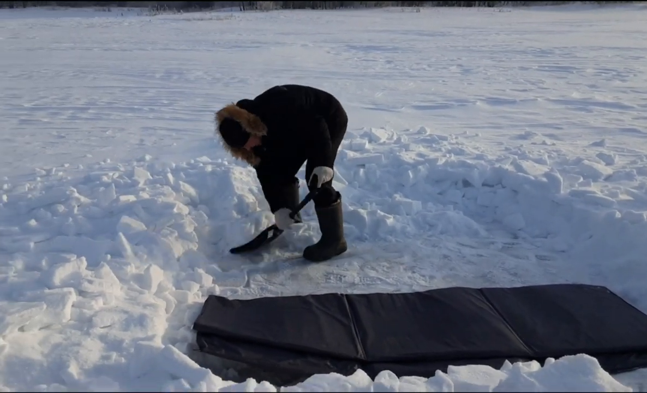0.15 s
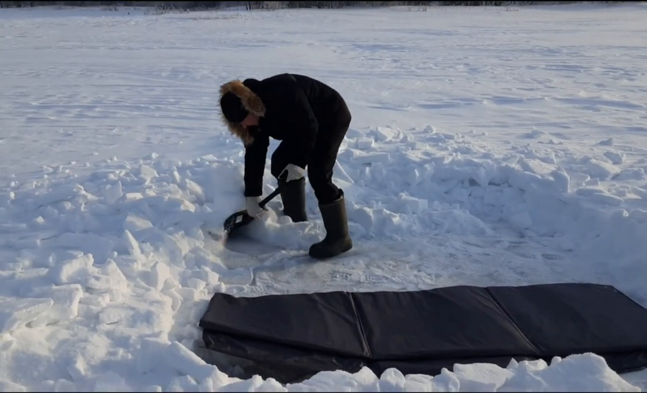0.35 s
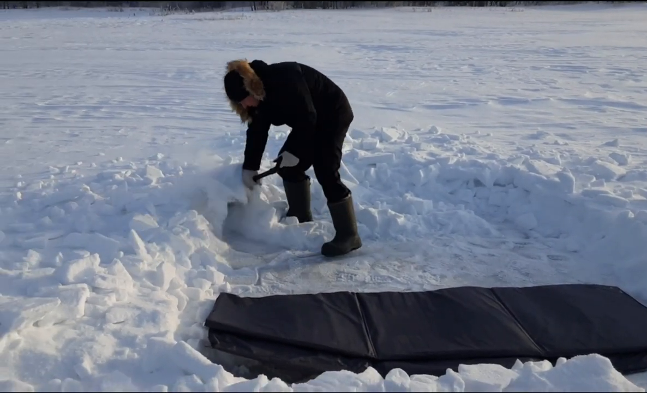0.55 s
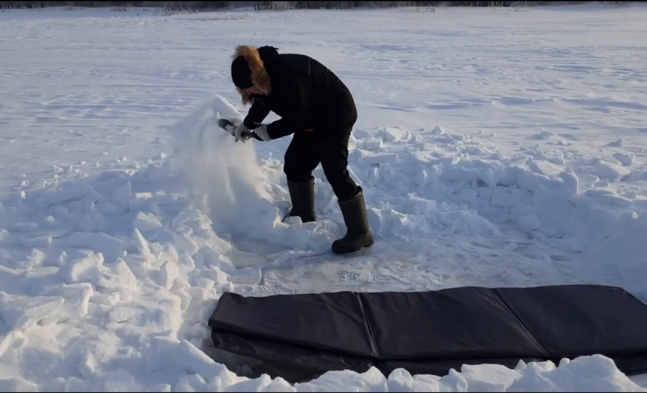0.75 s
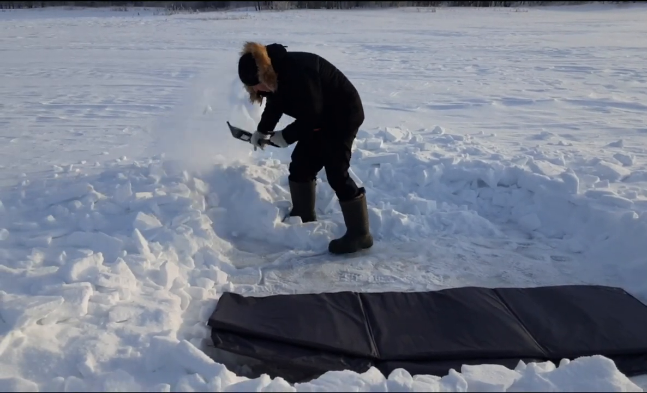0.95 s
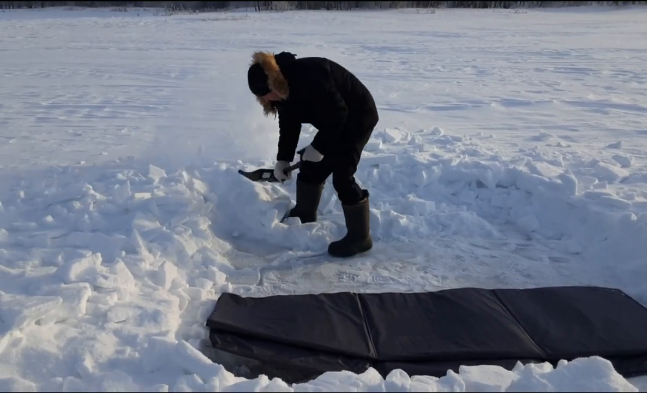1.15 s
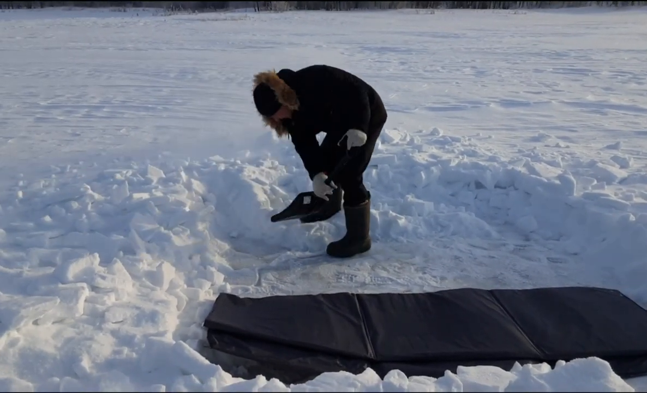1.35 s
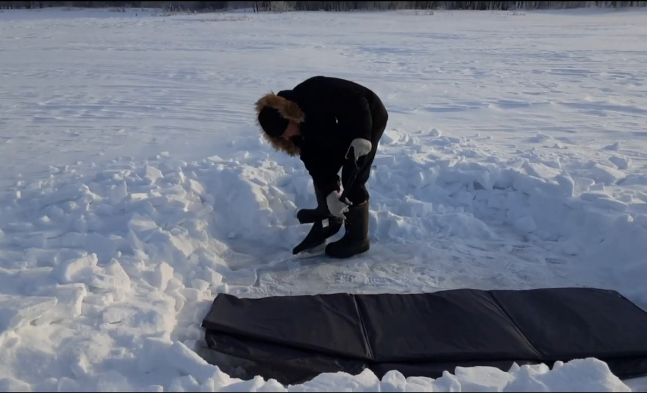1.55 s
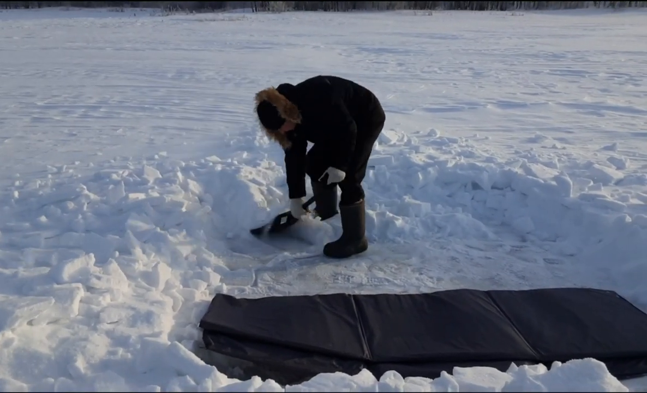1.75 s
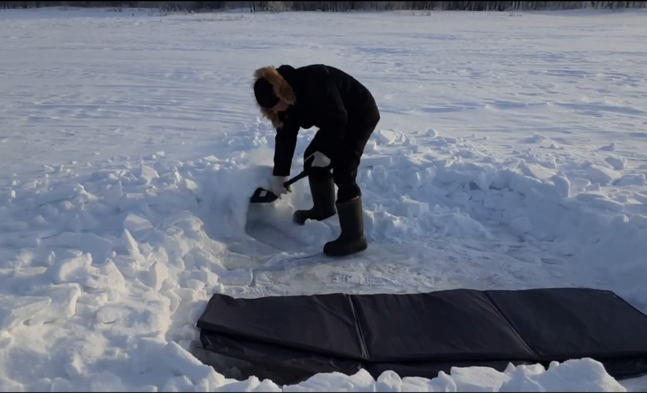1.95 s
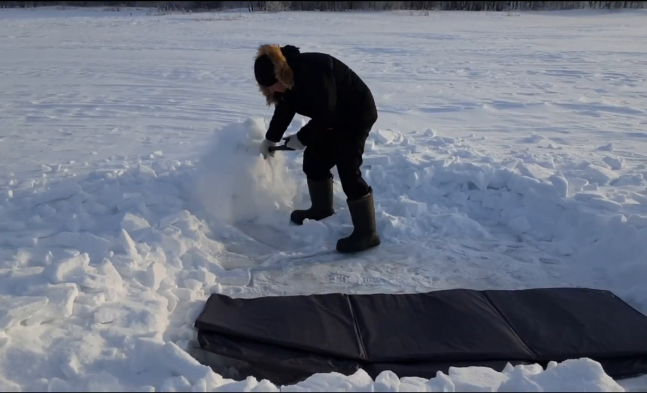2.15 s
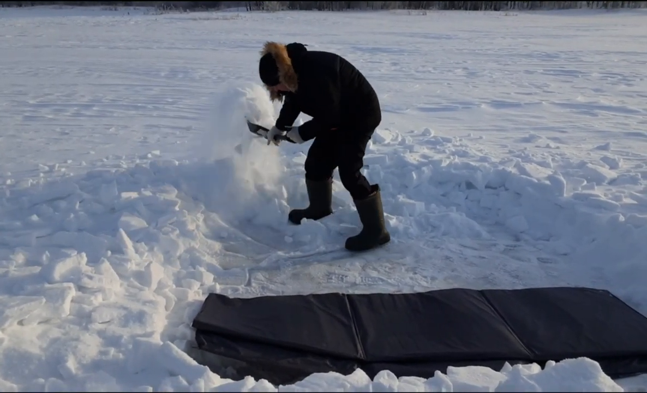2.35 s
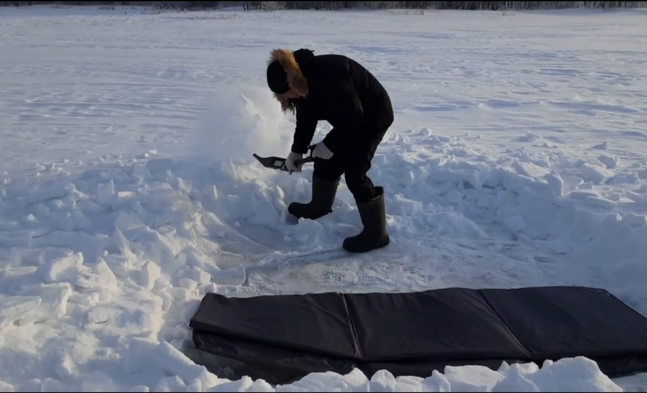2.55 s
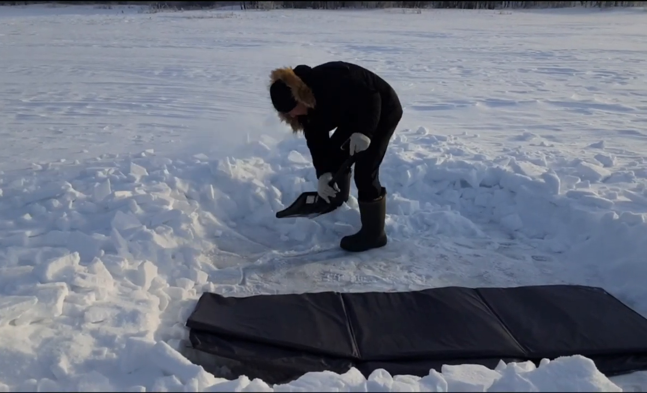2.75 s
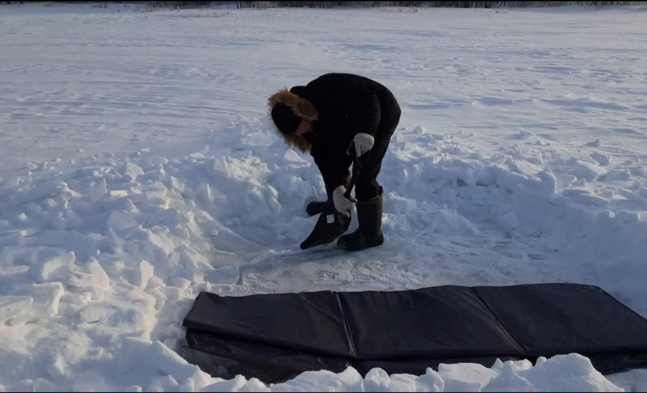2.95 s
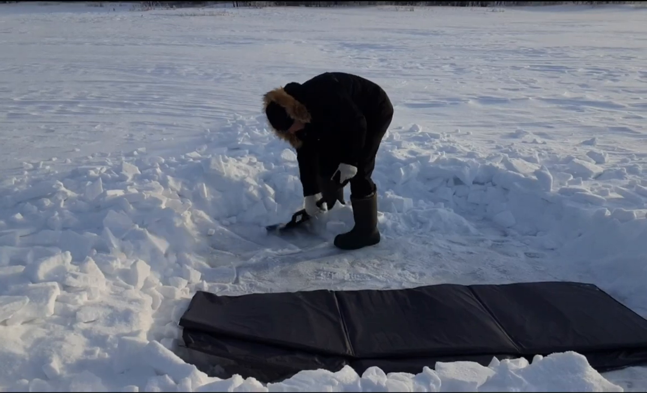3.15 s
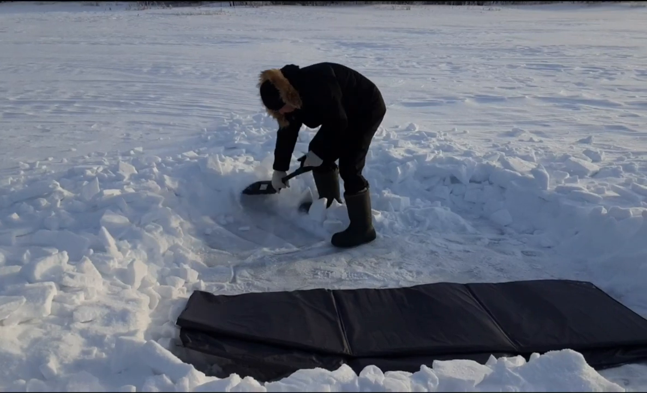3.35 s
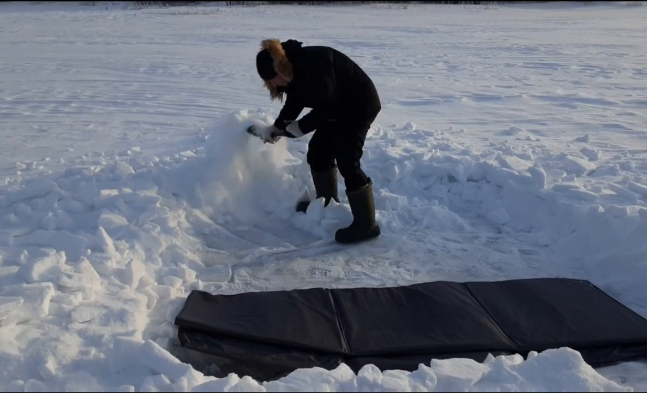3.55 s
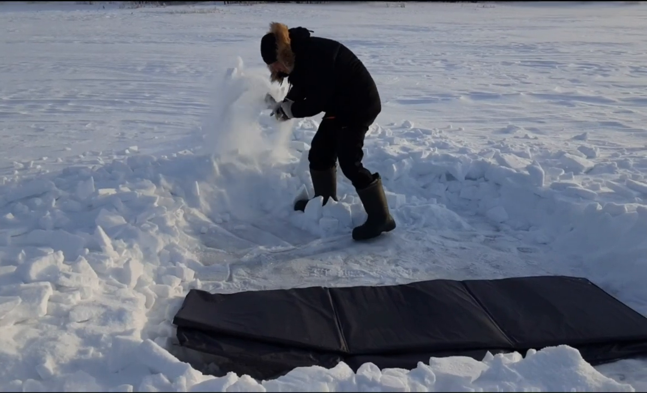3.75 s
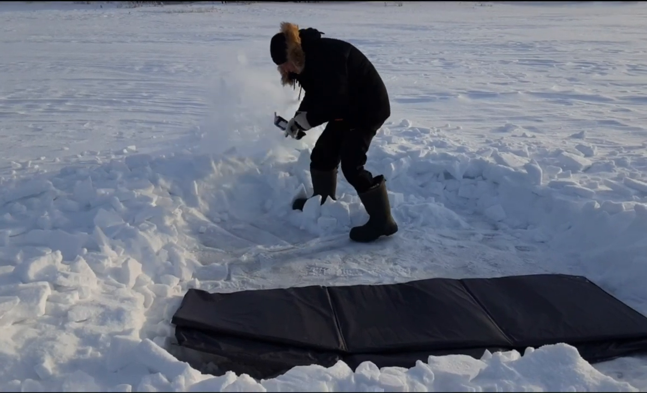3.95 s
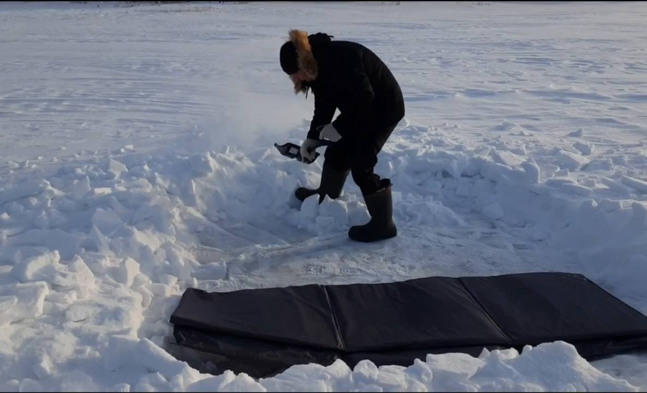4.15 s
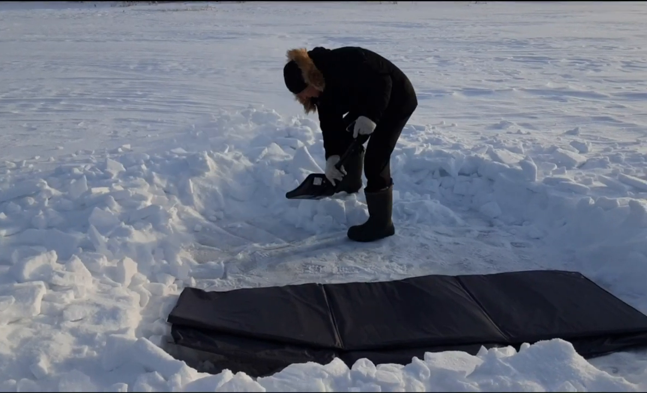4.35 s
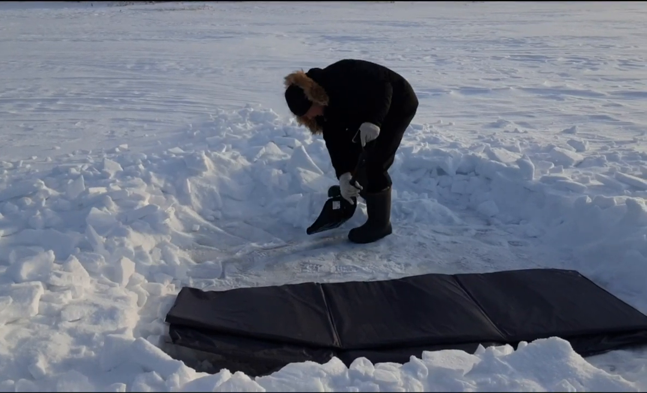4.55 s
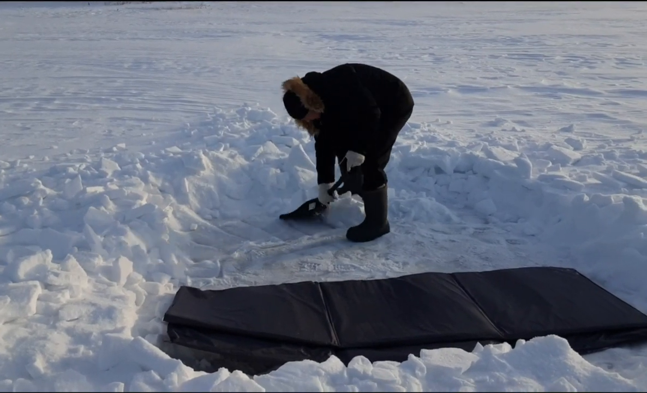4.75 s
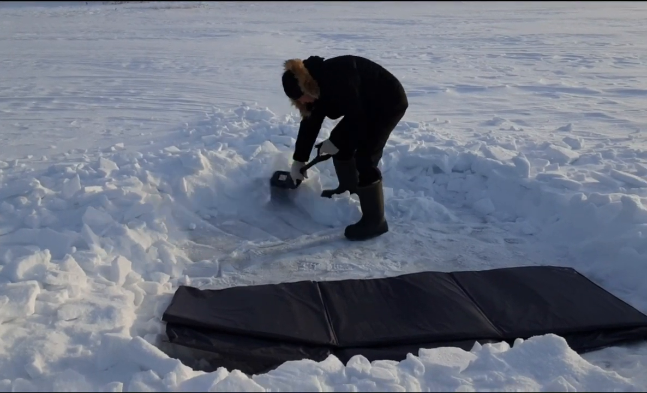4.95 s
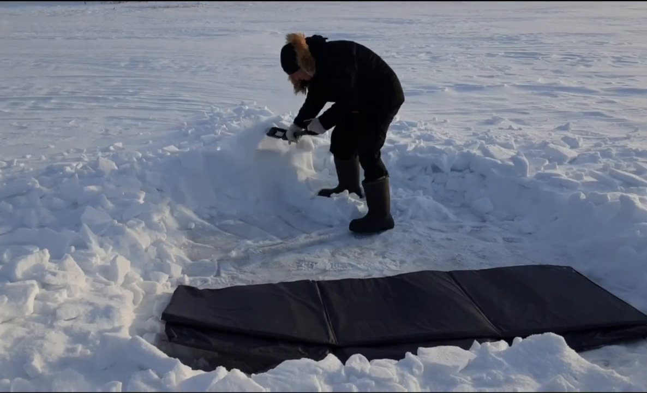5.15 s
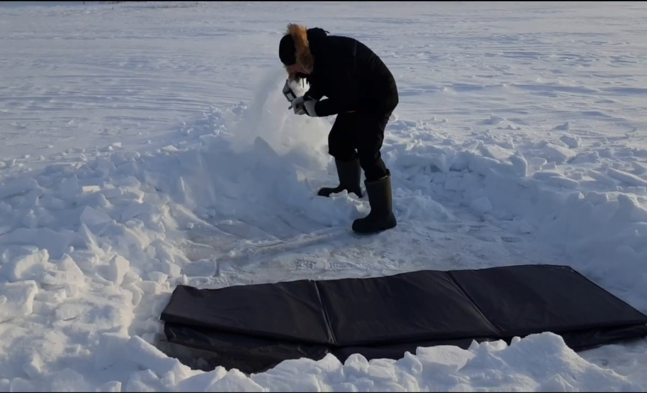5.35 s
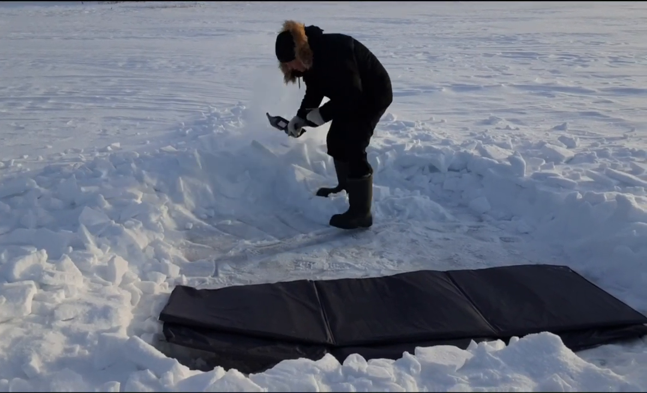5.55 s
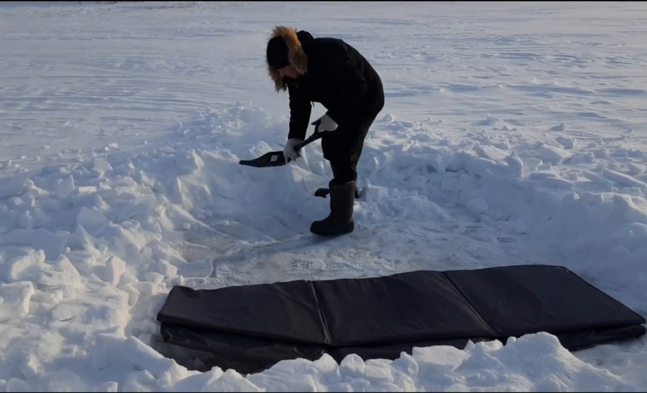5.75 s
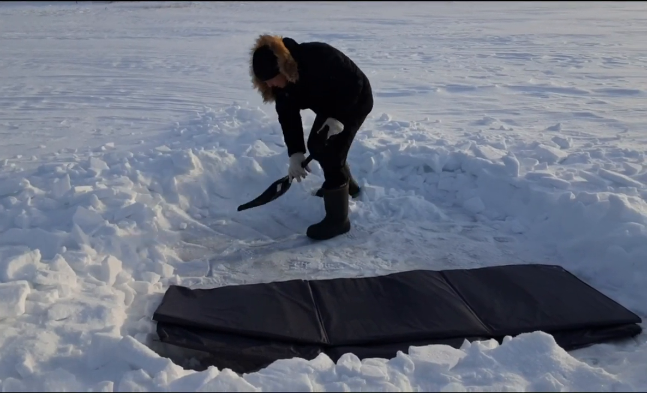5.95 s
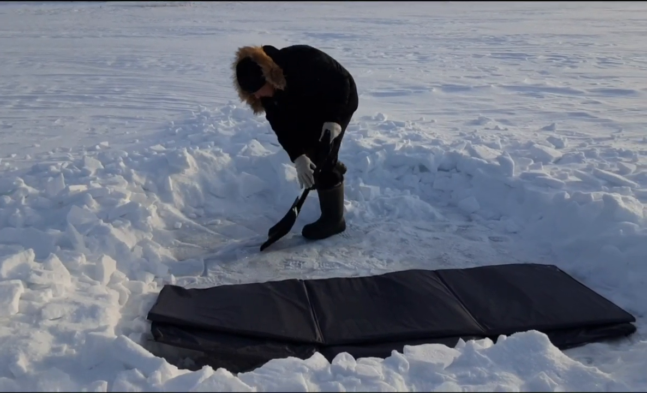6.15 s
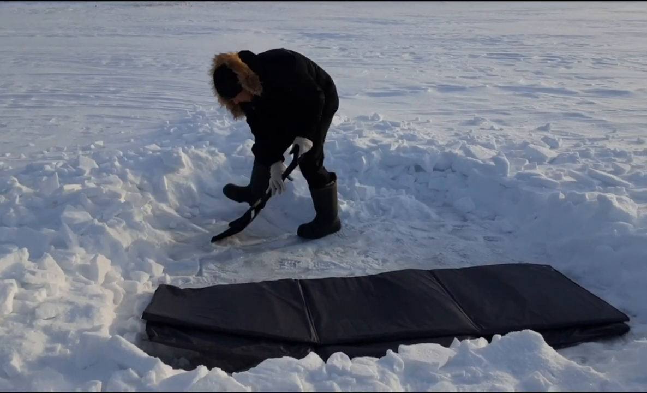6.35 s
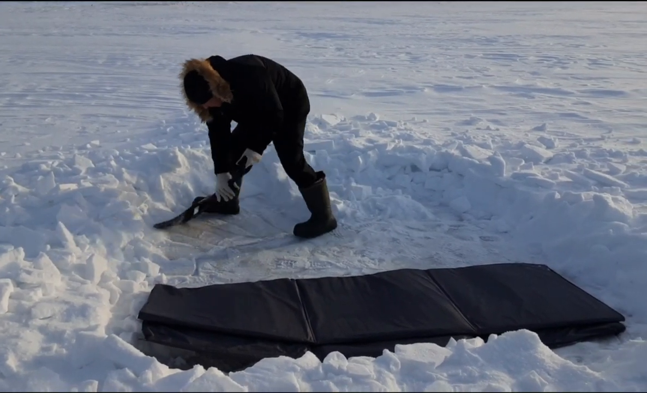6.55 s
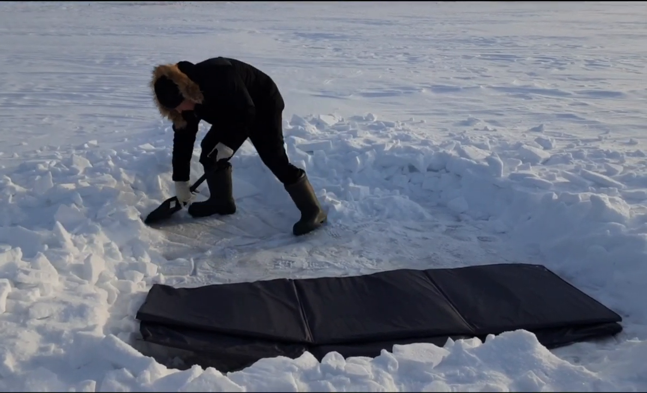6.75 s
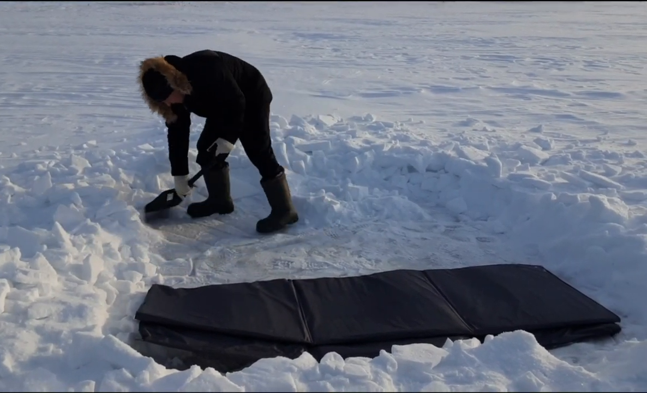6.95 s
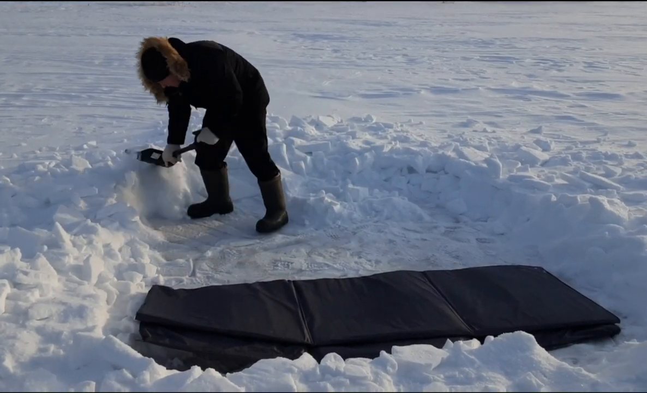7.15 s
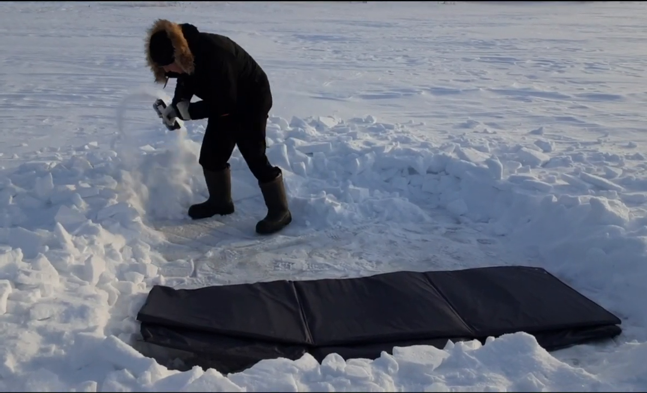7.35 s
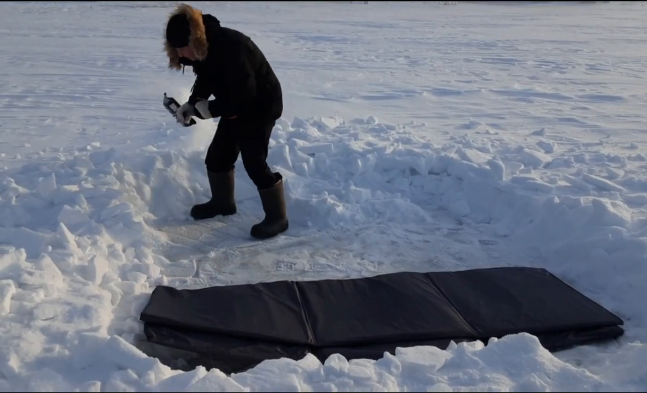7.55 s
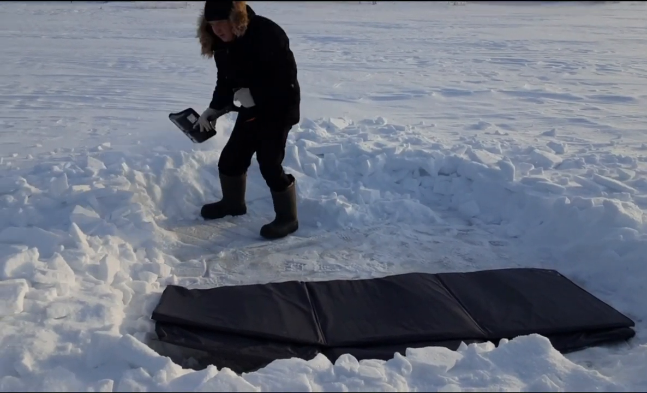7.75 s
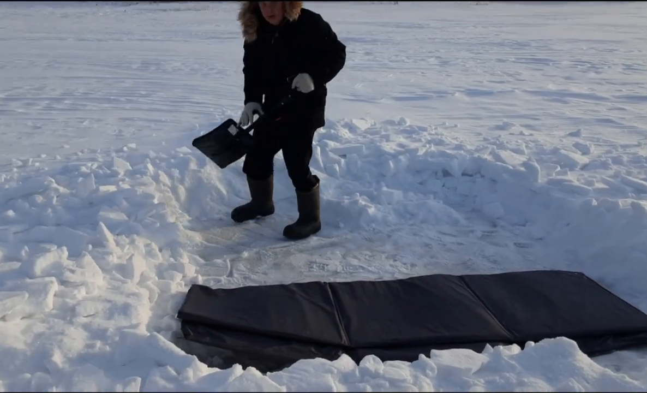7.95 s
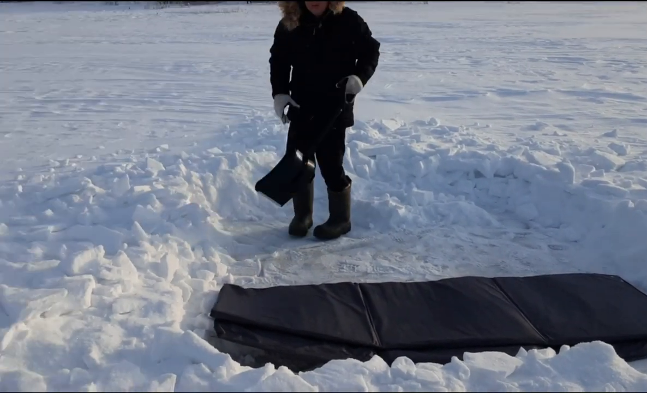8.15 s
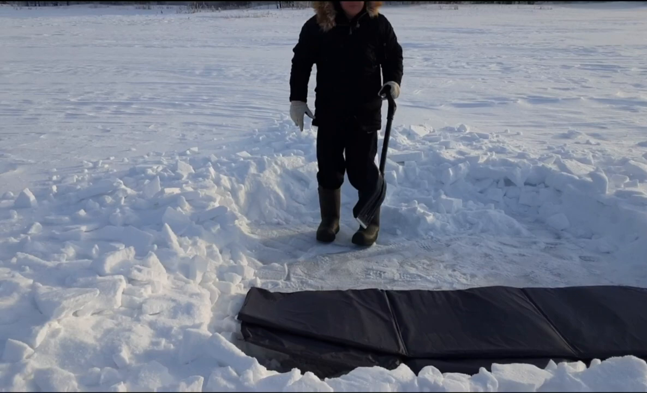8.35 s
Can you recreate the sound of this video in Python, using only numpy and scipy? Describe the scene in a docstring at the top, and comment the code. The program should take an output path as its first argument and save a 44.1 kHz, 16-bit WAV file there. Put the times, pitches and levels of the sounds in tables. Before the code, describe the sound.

A short shovel crunches into packed snow on lake ice in five strokes, with powder hissing, lumps ticking and thudding, and brief squeaks near the end.

```python
"""Shovelling snow on lake ice

A short shovel is pushed into packed snow, lifted and emptied, five strokes, in the open.
Random breaking grains excite the blade, the scoop's hollow and filtered snow; powder is hissing grains.
Thrown lumps thud as damped low tones and tick as short noise bursts, boots and sliding snow crunch,
the edge squeaks as a gliding tone, and a far motor hums over a low outdoor rumble."""
import sys
import numpy as np
from scipy import signal
from scipy.fft import rfft, irfft
from scipy.io import wavfile

SR = 44100
rng = np.random.default_rng(int(sys.argv[2]) if len(sys.argv) > 2 else 0)


def transcribe(signal):
    """Save signal, clipped to [-1, 1], as a 16-bit WAV file at the path in sys.argv[1]."""
    frames = np.atleast_2d(signal).T
    limited = np.clip(frames, -1, 1)
    pcm = np.round(limited * 32767).astype(np.int16)
    wavfile.write(sys.argv[1], SR, pcm)


def ratio_of_db(decibels):
    """Turn decibels (scalar or array-like) into linear amplitude factors; 0 dB maps to 1."""
    return 10 ** (np.asarray(decibels, float) / 20)


N = 374409

# pushes of the blade, one list each: (time [s], crunch [dB], powder hiss [dB])
STROKES = [
    [(0, -28, -32.5), (.084, -22.5, -30), (.17, -31, -38), (.267, -33, -38.5), (.369, -46, -49),
     (.401, -43, -45.5), (.515, -57.5, -59.5), (.6, -64, -72)],
    [(1.4, -59, -62), (1.435, -55, -46), (1.441, -38.5, -40), (1.469, -31.5, -33), (1.521, -24.5, -32.5),
     (1.636, -31, -36), (1.746, -31, -39), (1.798, -40, -41.5), (1.852, -45, -51), (1.9, -70, -67)],
    [(2.858, -55, -60), (2.863, -32, -36), (2.931, -27.5, -33.5), (2.989, -25.5, -34), (3.083, -30.5, -39),
     (3.111, -29, -37.5), (3.195, -37, -37.5), (3.243, -44, -48), (3.3, -70, -70)],
    [(4.46, -74, -73), (4.466, -50, -39), (4.476, -29.5, -43), (4.486, -24, -24), (4.514, -34.5, -35),
     (4.568, -23, -32.5), (4.62, -23, -34.5), (4.635, -31, -38), (4.677, -30.5, -37), (4.817, -43.5, -45),
     (4.99, -49.5, -50), (5.14, -62, -66)],
    [(6.028, -77, -62), (6.034, -29, -50), (6.044, -22, -42.5), (6.052, -33, -56), (6.078, -37, -49),
     (6.156, -27, -42.5), (6.206, -36, -48), (6.24, -26, -42), (6.389, -27.5, -40.5), (6.499, -30, -34.5),
     (6.587, -29.5, -39), (6.643, -35, -45), (6.733, -38, -45.5), (6.773, -47, -49), (6.85, -68, -65)],
]
# loose snow slides off the scoop, lands, or gives under a boot: (peak time [s],
# swell by 10 dB [s], fade by 10 dB [s], crunch [dB], powder hiss [dB])
SLIDES = [(.61, .07, 0.2, -51, -50), (.75, 0.06, .022, -51, -46.5), (.99, .055, .075, -37, -54),
          (1.145, .07, .04, -50, -44), (1.245, .07, .015, -51, -48), (1.341, 0.17, 0.14, -53.5, -55.5),
          (1.95, .17, .085, -44, -52), (2.09, .04, 0.07, -45.5, -50), (2.26, 0.34, .09, -59, -53),
          (2.34, .045, .08, -41, -54), (2.435, .08, .022, -39, -45), (2.55, .07, .13, -47, -43),
          (2.7, .01, 0, -39, -46), (3.268, .02, .05, -41.5, -39), (3.325, .04, .022, -45, -44),
          (3.39, 0.06, .06, -43.5, -47.5), (3.58, 0.2, 0.12, -48, -48), (3.652, .02, .02, -48, -48),
          (3.89, .15, .07, -41, -57), (3.925, .025, .17, -50.5, -45.5), (4.212, .012, .1, -47, -48),
          (4.31, .06, .06, -46, -44.5), (4.366, .04, .022, -46, -50), (4.857, 0.01, .04, -38.5, -39),
          (4.93, .045, 0.04, -39, -38.5), (5.055, 0.04, .06, -41, -46), (5.125, .04, .012, -46, -58),
          (5.275, .14, .06, -52, -49), (5.55, .055, 0.17, -41, -52), (5.7, 0.09, 0.09, -40.5, -56),
          (5.8, 0.14, .12, -55, -55), (6.83, .06, .05, -41, -44), (6.868, .01, .03, -38, -44),
          (6.922, 0.0251, .02, -32, -44), (6.96, 0.12, 0.02, -46, -44), (7.029, 0, .02, -33, -38),
          (7.08, 0.15, 0.08, -47.5, -50.5), (7.234, 0.13, 0.06, -48.5, -51), (7.385, .05, .045, -42.5, -49),
          (7.46, .06, 0.09, -50, -55), (7.59, .1, 0.12, -52, -54), (8.028, 0, 0.06, -44, -52),
          (8.135, .015, .07, -46.5, -53), (8.25, 0, 0.4, -54.5, -62)]
SLIDE_ROUNDNESS = 1.47   # 1 pointed, 2 bell-shaped
# snow trickling between the slides: (time [s], crunch [dB], powder hiss [dB])
TRICKLE = [(0, -60, -60), (.55, -58, -58), (.85, -66, -67), (1.2, -60, -57), (1.28, -65, -62),
           (1.4, -65, -68), (2.2, -62, -60), (2.83, -57, -56.5), (3.2, -62, -60), (3.7, -58, -56),
           (4.1, -64, -57), (4.2, -68, -61), (4.44, -72, -72), (5.2, -61, -57), (5.42, -72, -62),
           (5.85, -64, -60), (6.0, -72, -65), (7.2, -60, -61), (7.7, -64, -63), (7.82, -74, -68),
           (8.01, -82, -77), (8.1, -62, -68), (8.49, -62, -63)]
# what the edge meets: (time [s], ringing share of crunch power [0-1], powder fineness before band weights [dB])
EDGE_CONTACT = [(0, 0.25, -0.5), (1.4, 0.34, 2), (2.4, 0.07, 1.5), (2.8, 0.64, -4.5), (3.6, 0.13, 3),
                (4.4, 0.43, -1), (5.2, 0.46, 2.5), (5.95, 0, -4.5), (6.05, 0.83, -7), (6.3, 0.87, 8),
                (6.6, 0.58, 3.5), (7.0, 0.33, 7.5), (7.3, 0.65, 1.5), (8.49, 0, -0.5)]
# scoop fills and empties: (time [s], hollow pitch [Hz], loaded-snow thrum re crunch, at -38 dB crunch [dB])
SCOOP = [(0, 1400, -9.5), (.4, 1850, -11.5), (.78, 1200, -18), (1.0, 1350, -11), (1.5, 1380, -8),
         (1.75, 1250, -7.5), (1.95, 1550, -22), (2.4, 1350, -8.5), (2.6, 1600, -11), (2.9, 1450, -6),
         (3.19, 1130, -7.5), (3.26, 2100, -17), (3.36, 1450, -10), (3.92, 1350, -15), (4.4, 1400, -8.5),
         (4.5, 1620, -1.5), (4.7, 1350, -4.5), (4.93, 1750, -2.5), (5.13, 1300, 0), (5.17, 1400, -16),
         (5.55, 1650, -24), (5.7, 1350, -10.5), (6.0, 1450, -7), (6.04, 1070, -7.5), (6.13, 1500, -12.5),
         (6.23, 1150, -14), (6.5, 1350, -8.5), (6.86, 1100, -12.5), (6.93, 1680, -16), (7.03, 1330, -19),
         (7.4, 1550, -11.5), (8.0, 1600, -15), (8.49, 1150, -5)]
THRUM_LAG = 0.29   # dB of thrum lost per dB of crunch
# low push through the pack, as at a crunch of -40 dB: (time [s], level [dB])
PUSH = [(0, -48), (.3, -41), (.6, -51), (.85, -47), (1.2, -47), (1.33, -38), (1.39, -48), (1.6, -42),
        (1.95, -52), (2.4, -50), (2.56, -40), (2.9, -46), (3.2, -42), (3.85, -52), (3.96, -42), (4.25, -50),
        (4.6, -42), (5.06, -40), (5.3, -47), (5.62, -43), (6.0, -44), (6.15, -41), (6.55, -41), (6.85, -50),
        (7.4, -47), (7.7, -47), (8.49, -50)]
PUSH_FOLLOWS, PUSH_LUMPY_DB = 0.55, 2.0   # share of the crunch's swing; unevenness
# blade and scoop modes: (frequency [Hz], width per filter pass [Hz], relative level [dB])
BLADE_MODES = [(980, 253, 2.5), (1510, 260, -4.5), (1793, 200, 0), (2393, 335, 1), (2970, 160, -3),
               (3240, 710, -9.5)]
# edge modes: (frequency [Hz], width per filter pass [Hz], relative level [dB])
RIM_MODES = [(4400, 950, -2), (5850, 1260, 0), (6920, 740, 0.5), (7700, 400, -29)]
# spectrum of bare breaking snow: (frequency [Hz], relative density [dB per Hz])
CRUNCH_SPECTRUM = [(410, -34.5), (700, -13), (1420, -8), (2070, -15), (2490, -13), (4040, -26.5),
                   (4500, -20.5), (5850, -36), (9900, -120)]
# spectrum of powder hiss: (frequency [Hz], relative density [dB per Hz])
POWDER_SPECTRUM = [(1880, -15.5), (3200, -4.5), (3930, -4.5), (4450, -6.5), (5030, -5), (9660, 4),
                   (11000, -11), (15500, -11), (16200, -36), (16500, -41)]
# spectrum of the groaning pack: (frequency [Hz], relative density [dB per Hz])
PACK_SPECTRUM = [(18, -59), (30, -35), (65, -7.5), (109, -4.5), (199, 1), (351, -9), (399, -19.5),
                 (480, -17), (620, -37), (1060, -120)]
# spectrum of the loaded snow's dull thrum: (frequency [Hz], relative density [dB per Hz])
THRUM_SPECTRUM = [(200, -33.5), (340, -5.5), (497, 3.5), (719, -5), (800, -3), (1040, -20), (1760, -120)]
# thrown lumps of snow ticking, levels before the mix: (time [s], peak [dB], pitch [Hz], bright crack [dB])
TICKS = [(.808, -35, 600, -45.5), (.831, -32.5, 615, -61), (.885, -42, 616, -59), (.907, -40, 1240, -59),
         (1.069, -30, 1060, -50), (1.083, -27, 1240, -53), (1.128, -19, 1240, -49),
         (1.149, -27.5, 2580, -35), (1.847, -27, 1010, -52), (2.095, -31.5, 646, -52),
         (2.412, -23, 1430, -47), (2.588, -30.5, 2490, -43), (2.692, -33, 1220, -33),
         (2.87, -15, 1080, -23), (3.257, -22, 2380, -39), (3.518, -33, 1360, -51), (3.611, -29, 1890, -36),
         (3.914, -29, 1030, -30), (3.956, -23, 1280, -51), (3.989, -23, 1240, -45), (4.204, -32, 1300, -52),
         (4.464, -40, 1460, -32), (4.476, -20, 1780, -19), (4.621, -7.5, 1720, -42), (5.441, -36, 590, -59),
         (5.459, -35, 590, -63), (5.484, -36, 600, -45), (5.509, -26.5, 700, -49),
         (5.547, -18.5, 1510, -57), (5.702, -23, 1230, -43), (5.754, -23.5, 1400, -43),
         (5.778, -31, 1610, -44), (5.819, -26, 1420, -40), (6.032, -19, 990, -45),
         (6.042, -29, 1100, -31.5), (6.11, -26, 2310, -33), (6.249, -14.5, 1070, -44),
         (6.299, -10.5, 956, -40), (6.562, -16, 1120, -31), (6.583, -11, 1160, -37),
         (7.024, -33, 1060, -26), (7.034, -35, 1290, -29), (7.161, -32, 2500, -38), (7.178, -34, 910, -59),
         (7.333, -36, 1190, -55), (7.682, -35, 1770, -42), (7.787, -50, 1500, -48), (7.877, -43, 1100, -42),
         (7.948, -50, 778, -52), (8.024, -30, 2190, -36), (8.092, -35, 1210, -45), (8.134, -38, 1470, -51),
         (8.211, -30.5, 1250, -45), (8.396, -35, 980, -43)]
TICK_T60_S = 0.023
# further ticks at random times; peak over the crunch, before the mix
RANDOM_TICKS, TICK_OVER_DB, TICK_SPREAD_DB = 120, 6.0, 4.0
# lumps landing and the blade striking the ice: (envelope peak time [s], envelope peak [dB], pitch [Hz])
THUDS = [(0.295, -33, 186), (.981, -39.5, 217), (1.028, -40, 155), (1.126, -29, 160), (1.294, -30.5, 184),
         (1.316, -24.5, 266), (1.513, -26.5, 243), (2.546, -26.5, 213), (2.592, -25.5, 204),
         (2.636, -28, 198), (2.871, -21, 167), (3.019, -23, 195), (3.392, -31, 175), (3.517, -36, 229),
         (4.495, -21.5, 186), (4.602, -16.5, 215), (4.626, -17.5, 209), (4.837, -29.5, 163),
         (4.866, -32, 182), (4.938, -26, 163), (5.038, -31, 211), (5.613, -23, 94.5), (5.707, -28, 81),
         (5.759, -33, 248), (5.796, -33, 192), (6.046, -18, 187), (6.297, -23.5, 222), (6.397, -23, 188),
         (7.025, -32.5, 169), (8.033, -38.5, 101)]
THUD_T60_S = 0.04
# edge squeaking on the ice, one list each: (time [s], pitch [Hz], mean level [dB])
SQUEAKS = [
    [(6.628, 1120, -55), (6.636, 1190, -32), (6.655, 1310, -33), (6.678, 1360, -36), (6.705, 1270, -37),
     (6.73, 1150, -50)],
    [(6.854, 800, -55), (6.859, 850, -36), (6.875, 1020, -42), (6.905, 1200, -44), (6.93, 1400, -52)],
]
# spectrum of outdoor air: (frequency [Hz], relative density [dB per Hz])
AIR_SPECTRUM = [(18, -75), (30, 5.5), (153, 8), (1190, -25), (1720, -19), (2750, -19), (3580, -48),
                (5900, -35), (9460, -28.5), (16000, -20)]
AIR_DB = -56
HUM_HZ, HUM_DB = 312, -65   # far motor, mean values


def rms_one(x):
    """Scale to unit rms."""
    return x / np.sqrt(np.mean(x ** 2) + 1e-20)


def in_time(rows):
    """Columns of a table joined by straight lines, sample by sample."""
    times_s, *columns = np.transpose(rows)
    return [np.interp(np.arange(N) / SR, times_s, column) for column in columns]


def drift(rate_hz):
    """Slow chance: noise through a double one-pole low-pass, unit rms."""
    step = 20   # samples per drawn value
    r = np.exp(-2 * np.pi * rate_hz * step / SR)
    noise = rng.standard_normal(N // step + 2002)
    slow = signal.lfilter([1], [1, -2 * r, r * r], noise)[2000:]   # start-up dropped
    return np.interp(np.arange(N) / step, np.arange(len(slow)), rms_one(slow))


def colour(x, spectrum):
    """A causal minimum-phase filter that follows (frequency [Hz], level [dB]); unit rms out."""
    hz, level_db = np.transpose(spectrum)
    grid_hz = np.maximum(np.arange(4097) * SR / 8192, 1)
    gain = ratio_of_db(np.interp(np.log(grid_hz), np.log(hz), level_db))
    cepstrum = irfft(np.log(gain))
    cepstrum[1:4096] *= 2   # folding makes it causal
    cepstrum[4097:] = 0
    impulse = irfft(np.exp(rfft(cepstrum)))
    return rms_one(signal.fftconvolve(x, impulse)[:N])


def resonances(x, modes, shift_db=0.):
    """Parallel resonators, signs alternating; with shift_db each wavers as the contact point moves."""
    out = 0
    for k, (hz, width_hz, level_db) in enumerate(modes):
        r = np.exp(-np.pi * width_hz / SR)
        zeros = np.array([1, 0, -1]) * (1 - r * r) / 2
        poles = [1, -2 * r * np.cos(2 * np.pi * hz / SR), r * r]
        ring = signal.lfilter(zeros, poles, x)
        ring = signal.lfilter(zeros, poles, ring)   # second pass: dark valleys between the modes
        out = out + (-1) ** k * ratio_of_db(level_db + shift_db * drift(6.4)) * ring
    return rms_one(out)


def hollow(x, hz, sharpness):
    """A resonance applied twice whose centre moves, stepped in short blocks."""
    out, state = np.zeros(N), np.zeros((2, 2))
    for i in range(0, N, 256):
        r = np.exp(-np.pi * hz[i] / sharpness / SR)
        stage = [1 - r, 0, r - 1, 1, -2 * r * np.cos(2 * np.pi * hz[i] / SR), r * r]
        out[i:i + 256], state = signal.sosfilt([stage, stage], x[i:i + 256], zi=state)
    return rms_one(out / np.sqrt(hz))


def grains(per_s, spread_db, clump_db, clump_rate_hz):
    """Crystals break at random, clumped in loudness, a few far louder than the rest."""
    sizes = ratio_of_db(spread_db * np.minimum(rng.exponential(1, N), 5)) * rng.choice([-1, 1], N)
    broken = sizes * (rng.random(N) < per_s / SR)
    return broken * ratio_of_db(clump_db * drift(clump_rate_hz)) + 1e-18


def shovelling():
    """Breaking snow crunches, powder hisses above and the pack groans below, sharing one judder."""
    crunch_db, powder_db = snow_levels()
    ringing, fineness_db = in_time(EDGE_CONTACT)
    judder = drift(52)   # the edge sticks and slips, all layers feel it
    push_db = in_time(PUSH)[0] + PUSH_FOLLOWS * (crunch_db + 40) + PUSH_LUMPY_DB * drift(10.8)
    crunch = breaking_snow(crunch_db, powder_db, np.clip(ringing, 0, 1))
    return (ratio_of_db(crunch_db + 1.0 * judder) * crunch
            + ratio_of_db(powder_db + 1.0 * judder) * powder(fineness_db)
            + ratio_of_db(push_db + 0.17 * judder) * groaning_pack(push_db))


def snow_levels():
    """Crunch and powder hiss [dB]: pushes, slides and trickling snow add in power."""
    t = np.arange(N) / SR
    power = ratio_of_db(np.array(in_time(TRICKLE))) ** 2
    for rows in STROKES:
        pushing = (t >= rows[0][0]) & (t < rows[-1][0])
        power += pushing * ratio_of_db(np.array(in_time(rows))) ** 2
    for s, swell_s, fade_s, crunch_db, powder_db in SLIDES:
        near = slice(max(round((s - 5 * swell_s) * SR), 0), round((s + 5 * fade_s) * SR))
        away = np.where(t[near] < s, (s - t[near]) / swell_s, (t[near] - s) / fade_s)
        peak_db = np.array([[crunch_db], [powder_db]])
        power[:, near] += ratio_of_db(peak_db - 10 * away ** SLIDE_ROUNDNESS) ** 2
    return 10 * np.log10(power)


def breaking_snow(crunch_db, powder_db, ringing):
    """Breaking crystals heard bare, through the blade, through the scoop's hollow and as a dull thrum."""
    hollow_hz, thrum_db = in_time(SCOOP)
    thrum_db = thrum_db - THRUM_LAG * (crunch_db + 38)
    breaks = grains(3000, spread_db=2.5, clump_db=1.0, clump_rate_hz=90)
    bare = colour(breaks[::-1], CRUNCH_SPECTRUM)   # reversed: not in step with the blade
    dull = signal.sosfiltfilt(signal.butter(1, 1500, fs=SR, output="sos"), bare)
    tilt_db = 7.4 * np.log2(hollow_hz / 1430)   # an emptier scoop sounds brighter
    bare = ratio_of_db(-tilt_db) * dull + ratio_of_db(tilt_db) * (bare - dull)
    blade = scraped_blade(breaks, hollow_hz, lean_db=12.5, wander=0.029)
    crunch = np.sqrt(ringing) * blade + np.sqrt(1 - ringing) * bare
    # coarse snow with little powder slides out of the scoop and sounds through its hollow
    sliding = np.clip(0.16 + (crunch_db - powder_db - 6.0) / 14, 0, 0.9) * (1 - 1.1 * ringing)
    in_scoop = hollow(np.roll(breaks, SR), hollow_hz, sharpness=2.1)
    crunch = np.sqrt(1 - sliding) * crunch + np.sqrt(sliding) * in_scoop
    return crunch + ratio_of_db(thrum_db + 0.5 * drift(39)) * colour(breaks, THRUM_SPECTRUM)


def scraped_blade(breaks, hollow_hz, lean_db, wander):
    """The blade flexes, so its modes wander in pitch; the hollow's pitch tilts their drive up or down."""
    out, lean = 0, lean_db * np.log2(hollow_hz / 1430)
    for k, (hz, width_hz, level_db) in enumerate(BLADE_MODES):
        moving_hz = hz * (1 + wander * drift(5.5))
        ring = hollow(breaks, moving_hz, hz / width_hz) * np.sqrt(width_hz)
        gain_db = level_db + lean * np.log2(hz / 1500) + 2.5 * drift(12.8)
        out = out + (-1) ** k * ratio_of_db(gain_db) * ring
    return rms_one(out)


def powder(fineness_db):
    """Finer powder shifts the hiss upward; coarse, fine and finest grains flicker each on their own."""
    dust = grains(12000, spread_db=3.0, clump_db=1.2, clump_rate_hz=42)
    rim = resonances(dust[::-1], RIM_MODES, shift_db=3.5)
    hiss = rms_one(colour(dust, POWDER_SPECTRUM) + ratio_of_db(-6) * rim)
    coarse = signal.sosfiltfilt(signal.butter(2, 7800, fs=SR, output="sos"), hiss)
    finest = signal.sosfiltfilt(signal.butter(3, 10600, "high", fs=SR, output="sos"), hiss)
    fine = hiss - coarse - finest
    return (ratio_of_db(-0.6 * fineness_db + 3.14 * drift(4.0)) * coarse
            + ratio_of_db(1.1 * fineness_db + 1.5 * drift(14)) * finest
            + ratio_of_db(0.14 * fineness_db + 0.47 * drift(36)) * fine)


def groaning_pack(push_db):
    """Sparse low grains; a hard push rings the scoop, its deepest part grows less."""
    pack = colour(grains(600, spread_db=3.5, clump_db=0.0, clump_rate_hz=30), PACK_SPECTRUM)
    deep = signal.sosfiltfilt(signal.butter(2, 115, fs=SR, output="sos"), pack)
    return pack - deep + ratio_of_db(-0.6 * (push_db + 46)) * deep


def ticks():
    """Thrown lumps tick: short dying noise bursts, some with a bright crack, the blade ringing along."""
    size = SR // 6
    t = np.arange(size) / SR
    bursts, cracks = np.zeros(N + SR), np.zeros(N + SR)
    shape = (1 - np.exp(-t / 0.00055)) * ratio_of_db(-60 * t / TICK_T60_S)
    for s, peak_db, hz, crack_db in TICKS + random_ticks():
        noise = rng.standard_normal((2, size))
        band = signal.butter(2, [hz / 2.0, hz * 1.39], "band", fs=SR, output="sos")
        burst = shape * signal.sosfilt(band, noise[0])
        at = round(s * SR)
        bursts[at:at + size] += ratio_of_db(peak_db) * burst / np.abs(burst).max()
        cracks[at:at + size] += ratio_of_db(crack_db) * shape / shape.max() * noise[1]
    bursts, cracks = bursts[:N], cracks[:N]
    rung = resonances(bursts + 1e-18, BLADE_MODES) * np.sqrt(np.mean(bursts ** 2))
    bright = colour(cracks, POWDER_SPECTRUM) * np.sqrt(np.mean(cracks ** 2))
    return 0.62 * bursts + 0.13 * rung + 0.53 * bright


def random_ticks():
    """Random rows like those of TICKS, their levels following the crunch and powder around them."""
    when, size, pitch = rng.random((RANDOM_TICKS, 3)).T
    crunch_db, powder_db = snow_levels()[:, (when * (N - 1)).astype(int)]
    over_db = TICK_OVER_DB - TICK_SPREAD_DB * np.log(size + 0.02)
    pitch_hz = 700 * 4.0 ** pitch
    return list(zip(when * N / SR, crunch_db + over_db, pitch_hz, powder_db + over_db - 4.0))


def thuds():
    """A soft blow: a low tone that swells for about a cycle and is damped by the snow."""
    out, t = np.zeros(N + SR), np.arange(SR // 4) / SR
    for s, peak_db, hz in THUDS:
        shape = (1 - np.exp(-t * hz / 0.78)) ** 2 * ratio_of_db(-60 * t / THUD_T60_S)
        at = round(s * SR) - shape.argmax()
        out[at:at + len(t)] += ratio_of_db(peak_db) * shape / shape.max() * np.sin(2 * np.pi * hz * t)
    return out[:N]


def squeaks():
    """Stick and slip locks into a rough gliding tone."""
    out, t = 0, np.arange(N) / SR
    for rows in SQUEAKS:
        hz, level_db = in_time(rows)
        phase = 2 * np.pi * np.cumsum(hz * (1 + 0.025 * drift(150))) / SR
        sounding = (t > rows[0][0]) & (t < rows[-1][0])
        out = out + sounding * np.sqrt(2) * ratio_of_db(level_db + 3.5 * drift(90)) * np.sin(phase)
    return out


def outdoors():
    """Quiet air as filtered noise, and a far motor as a sine wavering in level and pitch."""
    phase = 2 * np.pi * np.cumsum(HUM_HZ + 2.98 * drift(4.4)) / SR
    hum = np.sqrt(2) * ratio_of_db(HUM_DB + 3.4 * drift(7.5)) * np.sin(phase)
    return ratio_of_db(AIR_DB) * colour(rng.standard_normal(N), AIR_SPECTRUM) + hum


def scene():
    """Sum of all sources, one channel; an open snowfield returns no echo."""
    return (shovelling() + thuds() + ticks() + squeaks() + outdoors())[None]


def roll_off(x):
    """The treble ends steeply here."""
    return signal.sosfilt(signal.butter(12, 16920, fs=SR, output="sos"), x)


def record(dry):
    """A small microphone that drops the deepest bass."""
    x = signal.sosfilt(signal.butter(3, 50, "high", fs=SR, output="sos"), dry)
    return roll_off(x)


dry = scene()
out = record(dry)
transcribe(out)
```